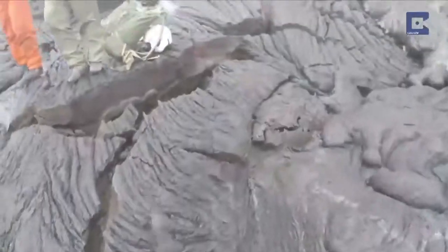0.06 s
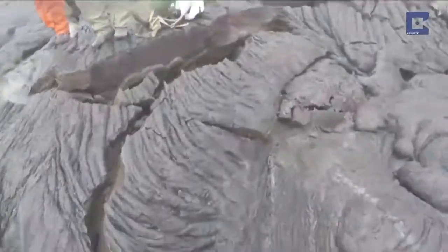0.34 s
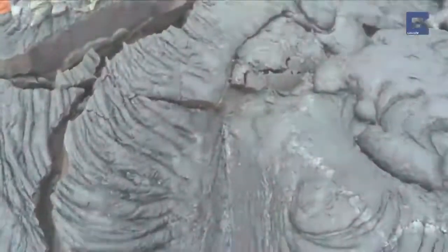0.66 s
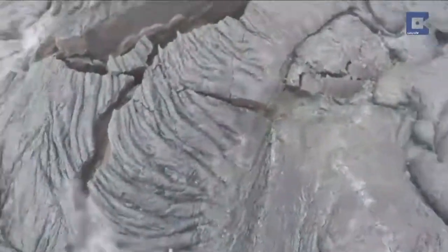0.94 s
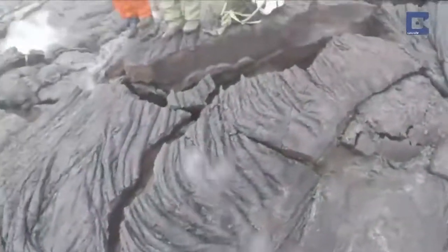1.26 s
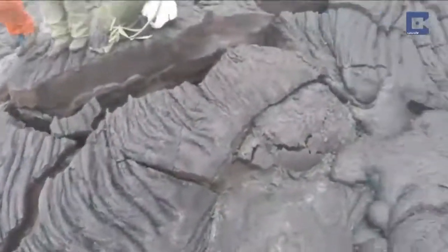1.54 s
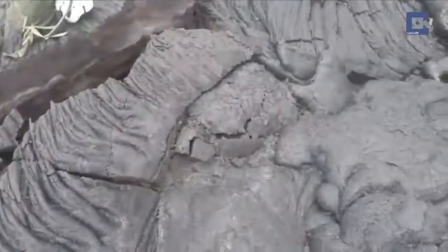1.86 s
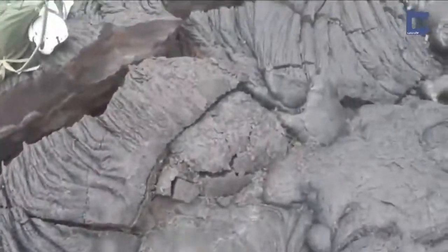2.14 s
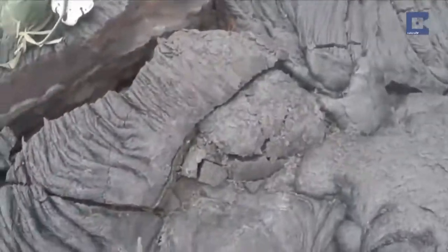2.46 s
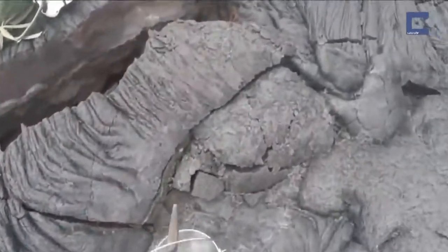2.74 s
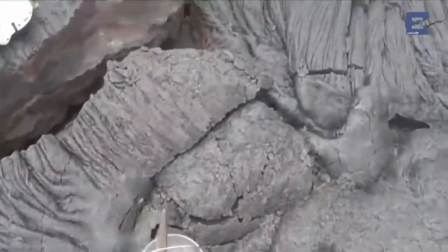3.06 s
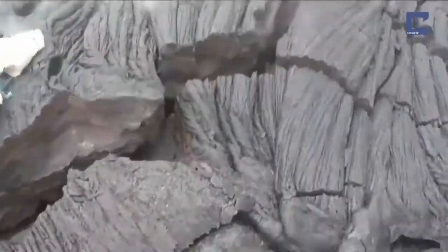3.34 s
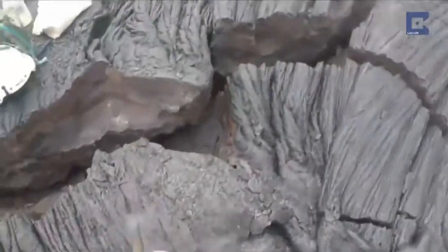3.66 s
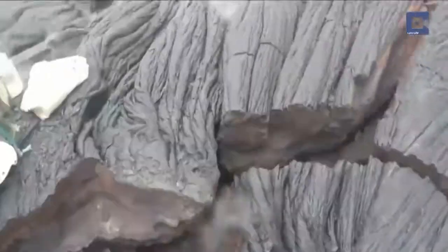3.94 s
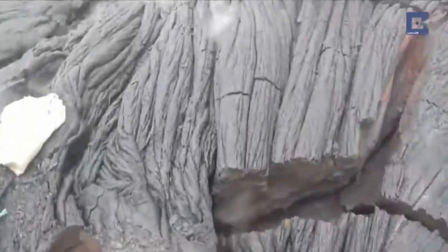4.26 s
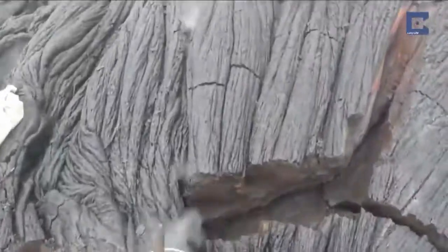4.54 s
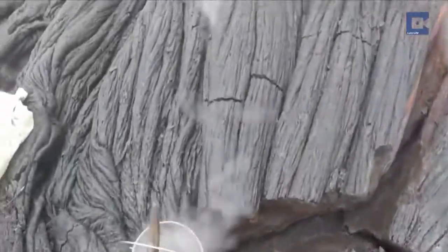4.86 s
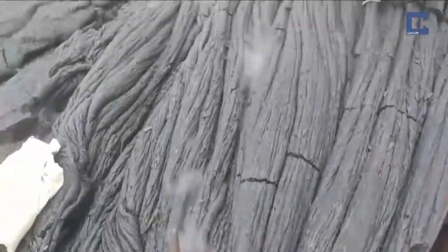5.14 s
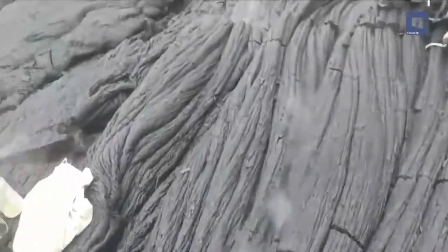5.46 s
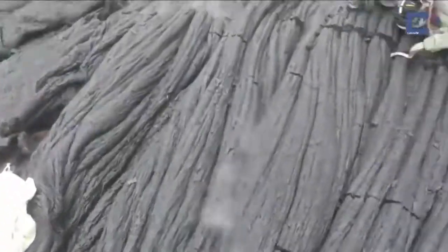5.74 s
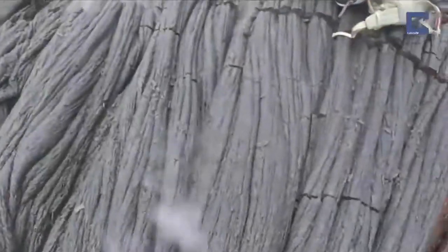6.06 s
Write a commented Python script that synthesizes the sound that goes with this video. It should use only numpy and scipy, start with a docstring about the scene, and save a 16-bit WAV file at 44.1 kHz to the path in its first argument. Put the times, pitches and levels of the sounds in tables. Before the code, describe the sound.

Outdoors, slow footsteps scuff over gritty, hardened lava close to a hand-held microphone. Small chips snap, and the hollow crust crunches and knocks about a second in, then loudest near the middle. Longer gritty slides follow before one last crunch. Low wind gusts and a rapid, even electrical thumping run underneath, and the footfalls bump the microphone.

```python
"""Slow steps on brittle lava crust, outdoors, close to a hand-held camera.
From the start wind rumbles, and an electrical pulse like a radio beacon's thumps ten times a second.
Soles scuff over glassy grit, chips snap, and footfalls jolt the microphone. Near 1 s the hollow crust
crunches and knocks under full weight; the heaviest step lands near 3.5 s. Long, gritty slides follow,
and a last step breaks the crust just after 6 s."""
import sys
import numpy as np
from scipy import signal
from scipy.fft import rfft, irfft, next_fast_len
from scipy.io import wavfile
from scipy.ndimage import uniform_filter1d

SR = 44100
rng = np.random.default_rng(int(sys.argv[2]) if len(sys.argv) > 2 else 0)


def persist_wave(psi):
    """Save psi, clipped to +-1, as 16-bit WAV."""
    counts = np.round(np.clip(psi, -1, 1) * 32767).astype(np.int16)
    wavfile.write(sys.argv[1], SR, np.atleast_2d(counts).T)


N = 277830
T = np.arange(N) / SR


def undb(db):
    """Decibels to gain."""
    return 10 ** (np.asarray(db) / 20)


def unit(x):
    """Scale to rms 1."""
    return x / np.sqrt(np.mean(x ** 2))


def add(track, s, sound):
    """Mix a short sound in at s seconds."""
    i = max(int(s * SR), 0)
    track[i:i + len(sound)] += sound[:max(N - i, 0)]


def cut(x, hz, kind, order):
    """Butterworth filter."""
    return signal.sosfilt(signal.butter(order, hz, kind, fs=SR, output="sos"), x)


def colour(x, points):
    """EQ x along a curve of (Hz, dB) points, rolling off past both ends; rms 1."""
    hz, db = np.transpose(points)
    size = next_fast_len(N)
    f = np.maximum(np.fft.rfftfreq(size, 1 / SR), 1)
    curve = undb(np.interp(np.log(f), np.log(hz), db))
    skirt = np.minimum(f / hz[0], 1) * np.minimum(hz[-1] / f, 1)
    return unit(irfft(rfft(x, size) * curve * skirt ** 2, size)[:N])


def ring(x, hz, width):
    """One resonance, gain 1 at its centre."""
    hz = min(hz, SR / 3)
    q = hz / min(width, SR / 4)
    return signal.lfilter(*signal.iirpeak(hz, q, fs=SR), x)


def drift(rate):
    """A smooth random wobble with a spread near 1 and `rate` turns a second."""
    hold = max(int(SR / rate), 1)
    steps = np.repeat(rng.standard_normal(N // hold + 1), hold)
    return unit(uniform_filter1d(steps, hold))[:N]


def grains(rate, spread_db):
    """About `rate` tiny impacts a second, of either sign: many weak, a few strong."""
    chance = rng.random(N) * SR / rate
    hits = np.flatnonzero(chance < 1)
    strength = np.minimum(-np.log(chance[hits]), 4)
    out = np.zeros(N)
    out[hits] = (-1) ** hits * undb(spread_db * strength)
    return unit(out)


def burst(texture, middle, half_length):
    """A stretch of grains under a load that swells and fades; times in seconds."""
    load = np.hanning(max(int(2 * half_length * SR), 16))
    return load * unit(texture.take(int(middle * SR) + np.arange(len(load)), mode="wrap"))


# Tone of the deep rumble and of the airy hiss. Each row: frequency in Hz, relative level in dB.
RUMBLE_EQ = [(12, -7.5), (24, 6.5), (40, -9.5), (70, -15.5), (120, -23), (250, -56), (600, -48)]
AIR_EQ = [(150, -5), (500, 0), (1100, -6.5), (2600, -5.5), (5000, -10.5), (8000, -15.5), (15000, -23.5)]
# Gusts. Each row: peak time in seconds, lift above the lull in dB.
WIND_GUSTS = [(0.42, 7.5), (1.06, 10), (1.62, 10), (2.17, 10), (2.95, 5.5), (3.5, 16), (4.12, 8),
              (4.76, 12), (5.46, 9.5)]


def wind(lull_db=-40.5, swell_s=0.13):
    """Gusts swell and die away on the microphone, over a faint, even hiss of open air."""
    gust_db = sum(db * np.exp(-((T - peak) / swell_s) ** 2) for peak, db in WIND_GUSTS)
    level = undb(lull_db + gust_db + 2.0 * drift(6.1))
    rumble = level * colour(rng.standard_normal(N), RUMBLE_EQ)
    hiss = undb(-66.0) * colour(rng.standard_normal(N), AIR_EQ)
    return rumble + hiss


def slide(start, length, attack_s=0.003, release_s=0.0079):
    """Envelope of a sliding sole: it bites, holds, then the grit settles."""
    ease = 0.1 * length  # long slides start and end more gently
    rise = np.clip((T - start + attack_s) / (attack_s + ease), 0, 1)
    settle = np.exp(-np.maximum(T - start - length, 0) / (release_s + ease / 2))
    return rise * settle


# Tone of the three sizes of grit. Each row: frequency in Hz, relative level in dB.
SAND_EQ = [(1500, -14), (2500, -9), (3500, 0), (4400, 0.5), (5600, 3), (6500, -0.5), (7600, -5),
           (10000, -29.5)]
COARSE_EQ = [(200, 7.5), (420, 0.5), (650, 2), (950, -2.5), (1350, 3), (1800, -4.5), (2400, -2), (3500, -8),
             (6000, -23)]
FINE_EQ = [(5500, -14), (8000, -0.5), (9600, -4), (11500, -11.5), (13700, -4.5), (15500, -25)]
# The bed of grit shifting under standing feet: levels in dB of sand, coarse crumbs and fine flakes.
GRIT_BED_DB = [-74, -70, -88]
# Scuffs. Each row: start in seconds, length in seconds, sand level in dB,
# then coarse crumbs and fine flakes, both in dB relative to the sand.
SOLE_SCUFFS = [(0.26, 0.33, -69, 5, -10), (0.323, 0.012, -55, -6, -10.5), (0.434, 0.025, -61.5, 1.5, -16),
               (0.89, 0.025, -60, 0, -13), (0.917, 0.084, -57, 3, -15), (1.009, 0.047, -69, 14, -14),
               (1.495, 0.11, -67.5, 6, -14), (2.082, 0.15, -67, 2, -12), (2.53, 0.23, -70, 3, -20),
               (2.763, 0.31, -66, 0.5, -13), (3.164, 0.12, -65, 2.5, -11), (3.406, 0.072, -55, 2.5, -14),
               (3.496, 0.053, -60.5, 6, -10), (3.69, 0.28, -66.5, -9, -10), (3.979, 0.022, -56, -1, -7),
               (4.0, 0.18, -62.5, 0.5, -7), (4.2, 0.11, -67, -1, -11), (4.363, 0.28, -65.5, -3, -6.5),
               (4.642, 0.081, -55.5, -2, -10), (4.735, 0.15, -61, 2.5, -7.5), (4.862, 0.15, -66, 2, -12),
               (5.356, 0.049, -61, -22, -15.5), (5.458, 0.076, -77, 4, -1), (6.151, 0.006, -51.5, 3.5, -13),
               (6.178, 0.14, -67.5, 12.5, -10)]


def grit(sway_db=1.8, grip_db=2.5):
    """Soles grind sand, coarse crumbs and fine glass flakes; the grip comes and goes."""
    power = np.outer(undb(GRIT_BED_DB), undb(sway_db * drift(3.18))) ** 2  # one row per grit size
    for start, length, db, coarse_db, fine_db in SOLE_SCUFFS:
        gains = undb([db, db + coarse_db, db + fine_db])
        power += np.outer(gains, slide(start, length)) ** 2
    sand = colour(grains(rate=5000, spread_db=5.0), SAND_EQ)
    coarse = colour(grains(rate=3000, spread_db=5.0), COARSE_EQ)
    fine = colour(grains(rate=3200, spread_db=5.0), FINE_EQ)
    grip = undb(grip_db * drift(70))
    return grip * np.sum(np.sqrt(power) * [sand, coarse, fine], axis=0)


def beacon(start_s=0.0527, period_s=0.102383):
    """Every electrical pulse tugs at the microphone's supply, then pulls it down in a short ramp."""
    drain, tug = np.zeros(N), np.zeros(N)
    for s in np.arange(start_s, N / SR, period_s):
        add(drain, s, np.ones(1))
        add(tug, s - 0.0028, np.hanning(int(0.0013 * SR)))
    ramps = uniform_filter1d(np.cumsum(drain), int(0.0016 * SR))
    thump = undb(-25.0) * cut(ramps, 2700, "low", order=1)
    tick = undb(-45.5) * cut(tug, 370, "high", order=1)
    return -thump - tick


# Pitched drags. Each row: middle in seconds, half-length in seconds, level in dB,
# pitch in Hz, nominal bandwidth in Hz.
SOLE_SCRAPES = [(0.42, 0.3, -71.5, 3350, 700), (0.857, 0.046, -64.5, 2900, 700),
                (1.699, 0.032, -66, 2080, 500), (2.217, 0.037, -66, 2190, 400),
                (2.805, 0.031, -58.5, 1430, 300), (3.234, 0.042, -66, 2140, 900),
                (3.808, 0.13, -67.5, 1230, 200), (3.991, 0.016, -53.5, 1200, 199),
                (4.143, 0.25, -68.5, 1290, 174), (4.76, 0.23, -68, 5700, 800), (4.84, 0.62, -72, 1326, 230),
                (5.935, 0.073, -73, 1227, 25)]


def scrapes():
    """A sole drags, and its dense, uneven slips make one note of the crust sing."""
    out, slips = np.zeros(N), grains(rate=3000, spread_db=6.5)
    for middle, half_length, db, hz, width in SOLE_SCRAPES:
        drag = burst(slips, middle, half_length)
        note = ring(ring(drag, hz, 0.66 * width), hz, 3 * width)
        add(out, middle - half_length, undb(db) * unit(note))
    return out


def crumbs(per_s=5, db=-58, spread_db=3.5, hz=1900, spread_octaves=0.3):
    """Faint chips scattered at random, as rows like those of LOUD_CHIPS."""
    draws = rng.standard_normal((int(per_s * N / SR), 3))
    return [((k + late) / per_s, db + spread_db * loud, hz * 2 ** (spread_octaves * high))
            for k, (late, loud, high) in enumerate(draws)]


# The snaps that stand out. Each row: start in seconds, peak level in dB, centre frequency in Hz.
LOUD_CHIPS = [(0.5754, -47, 1310), (1.073, -51, 2160), (1.1828, -49, 1380), (1.509, -43, 1280),
              (1.579, -46.5, 1320), (2.803, -42, 1450), (2.827, -42, 1430), (3.0174, -42.5, 5500),
              (3.5064, -37.5, 1450), (3.7547, -44.5, 1220), (3.8452, -44, 1330), (3.986, -51, 1240),
              (4.5372, -44.5, 1340), (5.476, -51.5, 1290), (5.7137, -44.5, 2070)]


def chips(tail_t60_s=0.034, snap_decay_s=0.0029):
    """Each chip snaps at once and trails a quickly fading spray."""
    out, t = np.zeros(N), T[:SR // 16]
    fade = undb(-60 * t / tail_t60_s) + 0.8 * np.exp(-t / snap_decay_s)
    for start, db, hz in list(LOUD_CHIPS) + crumbs():
        spray = rng.standard_normal(len(t)) * fade
        snap = ring(spray, hz, width=0.46 * hz) + undb(-11) * ring(spray, 4300, width=3000)
        snap = cut(snap, 6700, "low", order=2)
        snap = cut(snap, 540, "high", order=2)
        add(out, start, undb(db) * snap / np.abs(snap).max())
    return out


# Handling bumps. Each row: middle in seconds, level in dB before the bass roll-off,
# half-length in seconds.
FOOTFALL_JOLTS = [(0.466, -15.5, 0.022), (0.648, -17.5, 0.021), (0.95, -7.5, 0.0087),
                  (1.035, -11.5, 0.0099), (1.531, -3.5, 0.026), (3.431, -1.5, 0.015), (3.54, -10.5, 0.012),
                  (3.732, -13.5, 0.0094), (4.017, -10, 0.02), (5.635, -14.5, 0.018), (6.197, -10.5, 0.011),
                  (6.232, -12, 0.023)]


def jolts(rebound_delay_s=0.0362, rebound_half_s=0.034, rebound_db=-5.5):
    """Each footfall pushes the microphone once; the hand gives and swings back more softly."""
    out = np.zeros(N)
    for middle, db, half_length in FOOTFALL_JOLTS:
        push = (middle, db, half_length)
        rebound = (middle + rebound_delay_s, db + rebound_db, rebound_half_s)
        for at, level_db, half in (push, rebound):
            add(out, at - half, undb(level_db) * np.hanning(int(2 * half * SR)) ** 2)
    return out


# The crust's hollow body and brittle edge. Each row: pitch in Hz, bandwidth in Hz, relative gain in dB.
BODY_MODES = [(407, 54, -4.5), (492, 120, -4), (629, 66, -5.5)]
EDGE_MODES = [(970, 330, -3), (1290, 173, -5.5), (1730, 15, -12.5), (2184, 56, -8), (2700, 140, -6.5)]
# The crust gives way. Each row: middle in seconds, half-length in seconds, drive in dB,
# hardness in dB (tilts the drive from body to edge).
CRUST_BREAKS = [(0.9433, 0.0057, -24, -2.5), (0.994, 0.017, -47.5, 9), (1.029, 0.007, -36.5, 13.5),
                (1.536, .02, -50.5, -2), (1.554, .006, -39, -4), (3.423, 0.007, -24, 5),
                (3.441, 0.014, -21.5, 4), (3.468, .013, -22.5, 3.5), (3.505, 0.044, -41.5, -3),
                (3.5382, 0.0066, -27.5, 6.5), (3.732, 0.014, -40, -1), (4.033, 0.013, -54, -20),
                (6.201, 0.06, -48, -2), (6.2242, .010, -31, 2), (6.265, .019, -33, 1)]


def crunches():
    """Bursts of tiny fractures ring the hollow crust; a harder break favours its upper modes."""
    soft, hard = np.zeros(N), np.zeros(N)
    fractures = grains(rate=6000, spread_db=2.5)
    for middle, half_length, db, hardness_db in CRUST_BREAKS:
        cracks = burst(fractures, middle, half_length)
        add(soft, middle - half_length, undb(db - hardness_db / 2) * cracks)
        add(hard, middle - half_length, undb(db + hardness_db / 2) * cracks)
    body = sum(undb(db) * ring(soft, hz, width) for hz, width, db in BODY_MODES)
    edge = sum(undb(db) * ring(hard, hz, width) for hz, width, db in EDGE_MODES)
    crust = cut(undb(18.0) * body + undb(8.0) * edge, 220, "high", order=2)
    return cut(crust, 2590, "low", order=8) + undb(-26.5) * crust  # dark, with a trace of top


# Loose slabs. Each row: start in seconds, peak level in dB, pitch in Hz, seconds to fade by 60 dB.
SLAB_KNOCKS = [(0.9429, -14, 534, 0.01), (1.000, -35.5, 394, 0.023), (1.550, -36.5, 608, .03),
               (3.7268, -28.5, 413, .018), (6.193, -43, 510, .015), (6.266, -30.5, 460, 0.021)]


def knocks(attack_s=0.00072):
    """A rocking slab gives a dead knock of a few cycles."""
    out, t = np.zeros(N), T[:SR // 10]
    for start, db, hz, t60 in SLAB_KNOCKS:
        envelope = (1 - np.exp(-t / attack_s)) * undb(-60 * t / t60)
        knock = -np.sin(2 * np.pi * hz * t) * envelope
        add(out, start, undb(db) * knock / np.abs(knock).max())
    return out


def scene():
    """The mono mix; the microphone's bass roll-off turns pushes and ramps into slow swings."""
    swings = cut(beacon() - jolts(), 24.0, "high", order=4)
    return (swings + wind() + grit() + scrapes() + chips() + crunches() + knocks())[None]


# The camera's case rings around the microphone. Each row: centre in Hz, width in Hz, boost or cut in dB.
CASE_EQ = [(3500, 64, 5.5), (3600, 100, -8.5), (5200, 200, 2), (5180, 400, -7.5), (5220, 160, -0.5),
           (6610, 470, -5), (7070, 120, 2), (7740, 1000, -4), (8060, 300, 1.5), (9700, 290, 2),
           (9880, 460, -1.5), (10560, 470, 2)]


def record(dry, top_hz=15300):
    """The case colours the treble with narrow peaks and dips; the camera cuts the top."""
    for hz, width, db in CASE_EQ:
        dry = dry + (undb(db) - 1) * ring(dry, hz, width)
    return signal.sosfilt(signal.ellip(8, 0.2, 70, top_hz, fs=SR, output="sos"), dry)


dry = scene()
out = record(dry)
persist_wave(out)
```